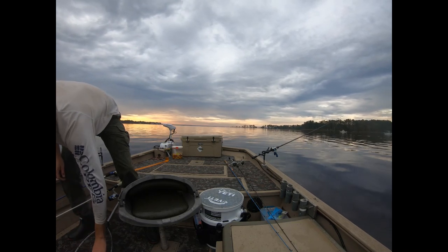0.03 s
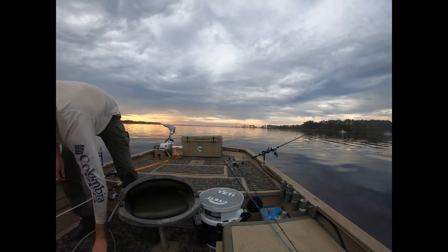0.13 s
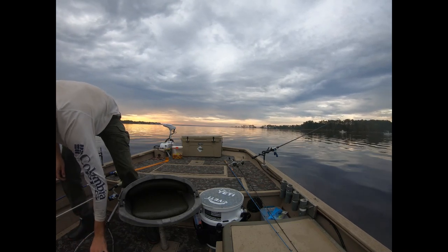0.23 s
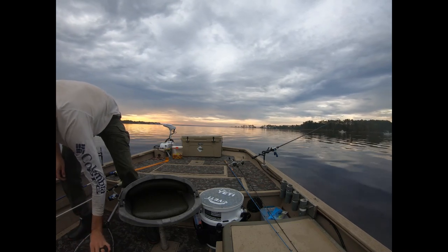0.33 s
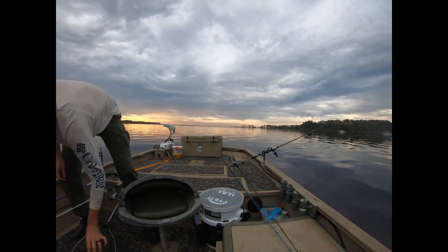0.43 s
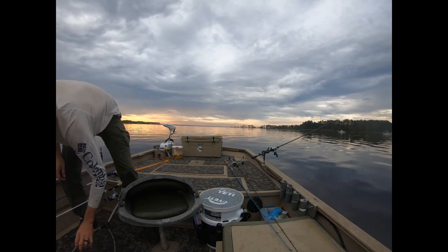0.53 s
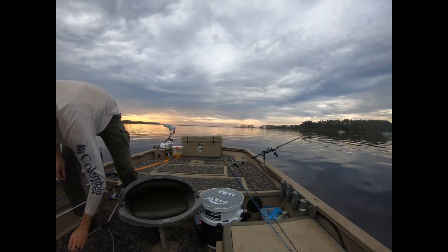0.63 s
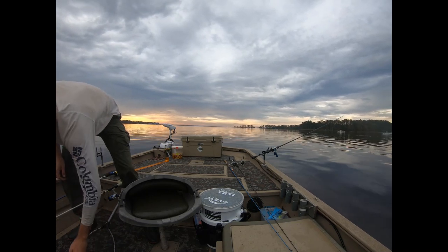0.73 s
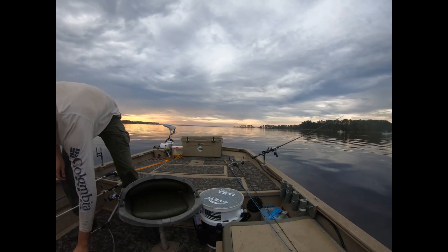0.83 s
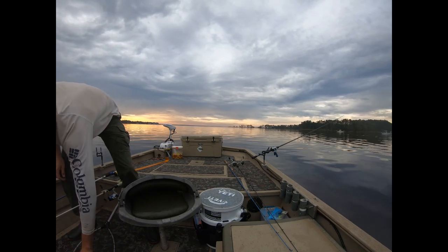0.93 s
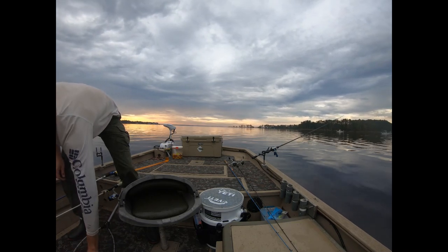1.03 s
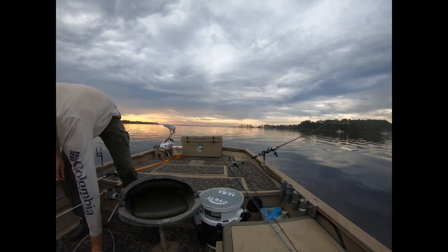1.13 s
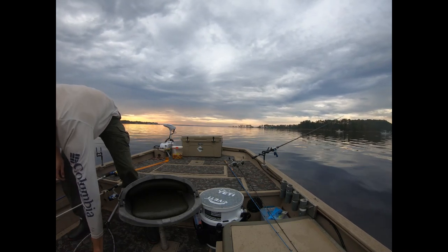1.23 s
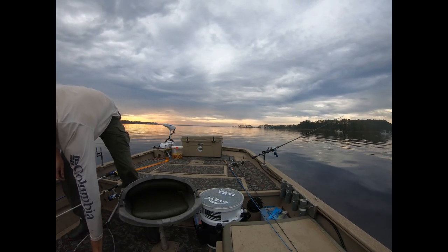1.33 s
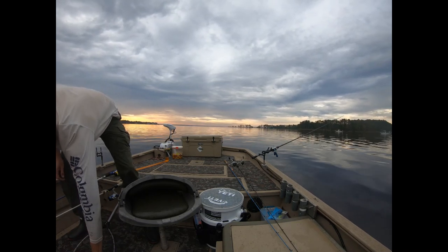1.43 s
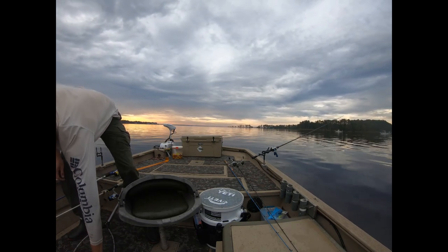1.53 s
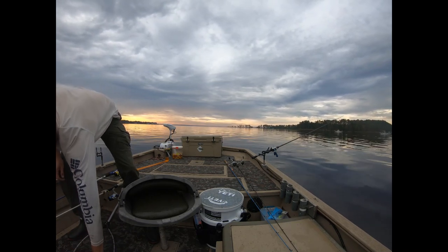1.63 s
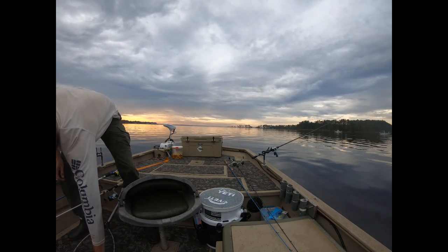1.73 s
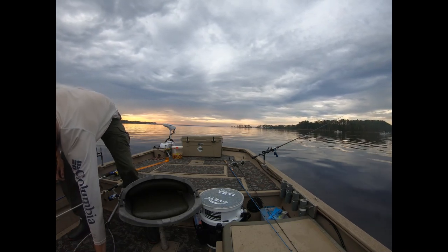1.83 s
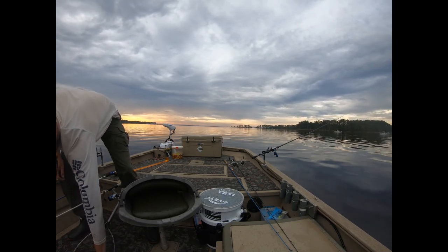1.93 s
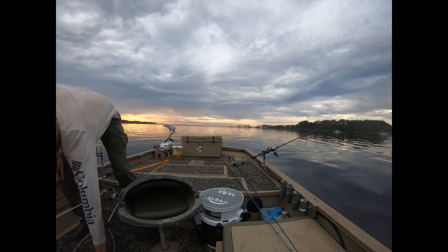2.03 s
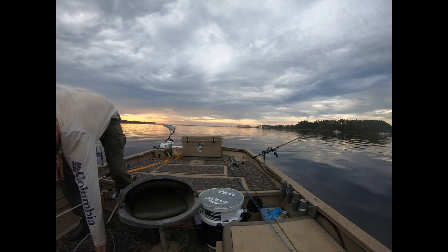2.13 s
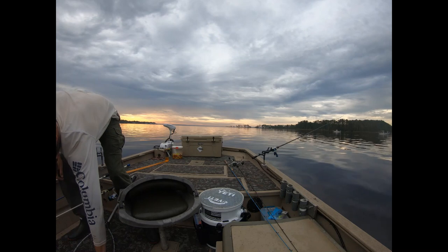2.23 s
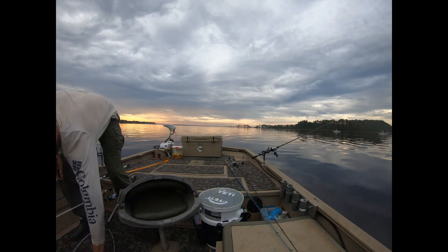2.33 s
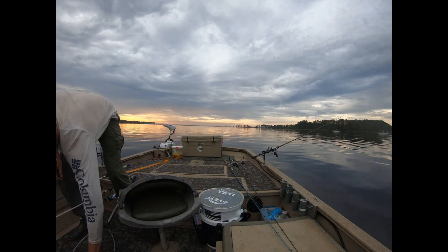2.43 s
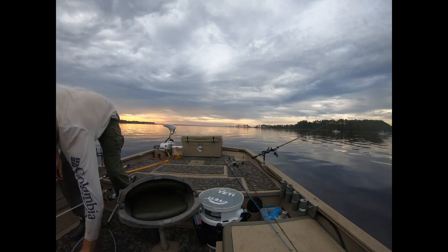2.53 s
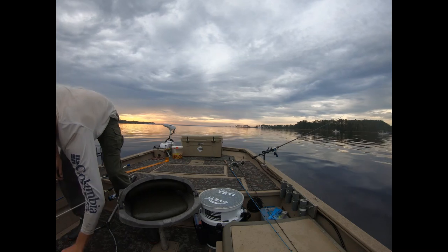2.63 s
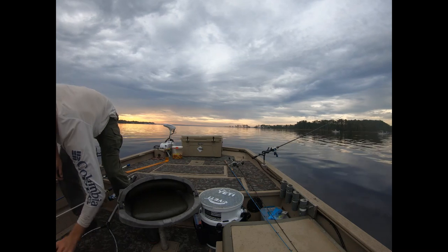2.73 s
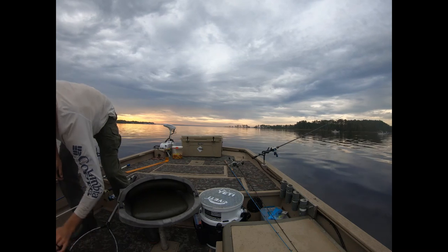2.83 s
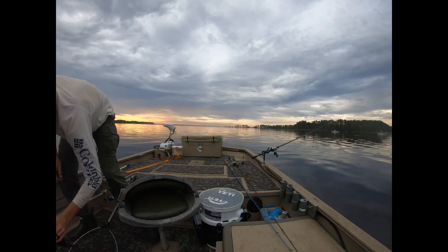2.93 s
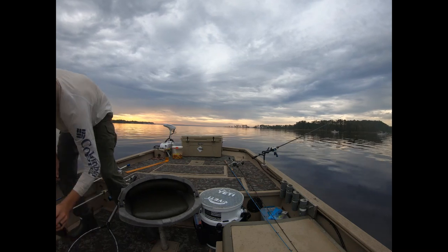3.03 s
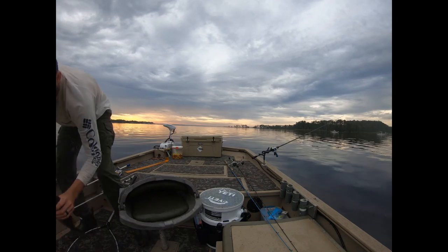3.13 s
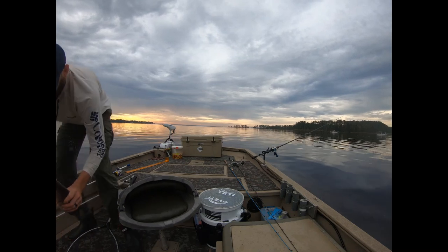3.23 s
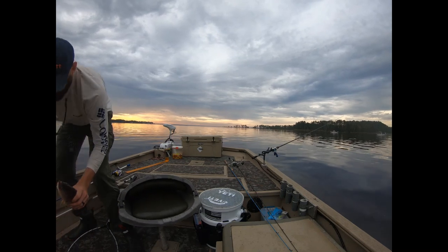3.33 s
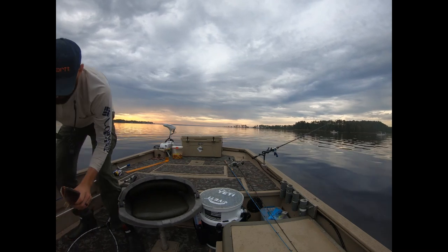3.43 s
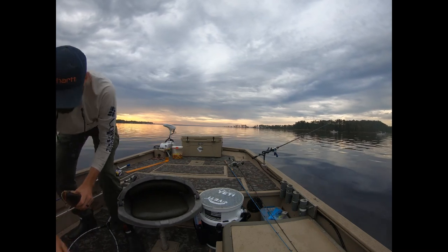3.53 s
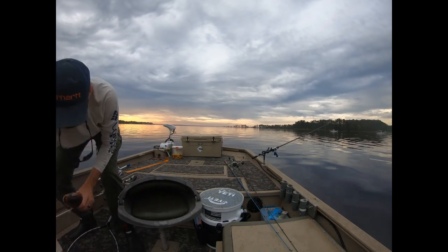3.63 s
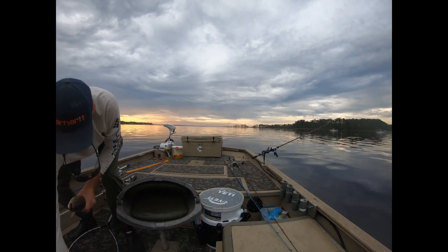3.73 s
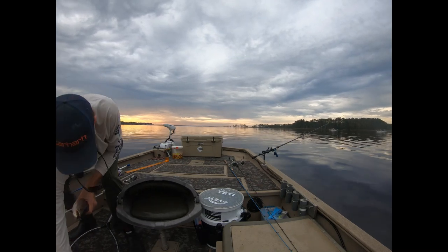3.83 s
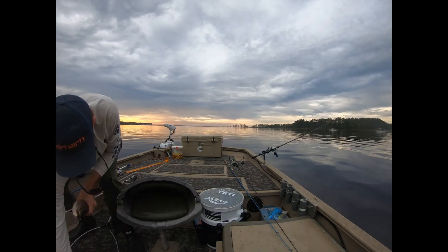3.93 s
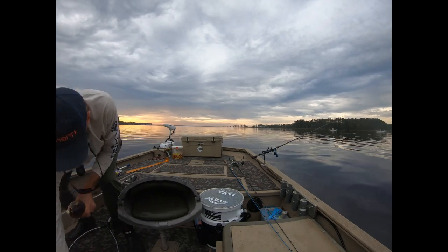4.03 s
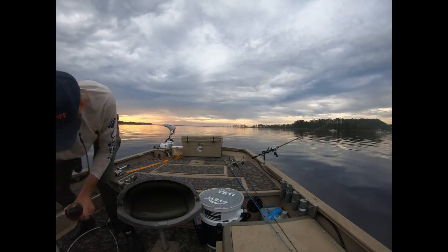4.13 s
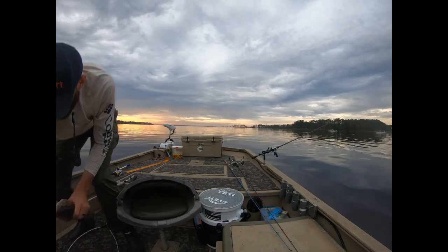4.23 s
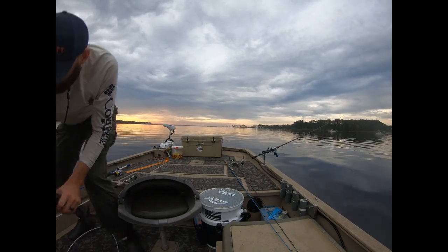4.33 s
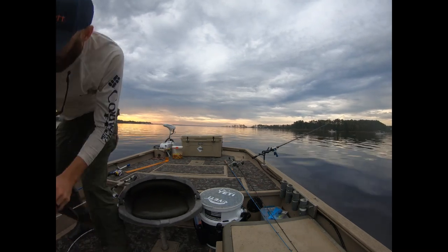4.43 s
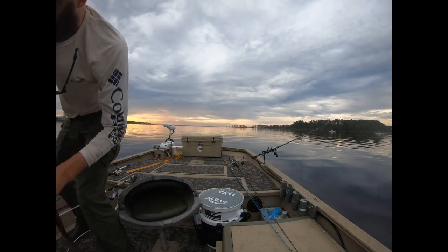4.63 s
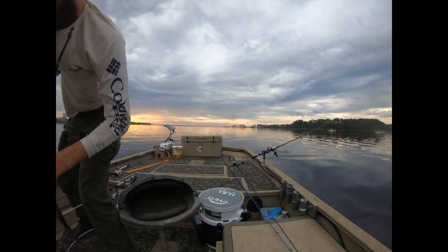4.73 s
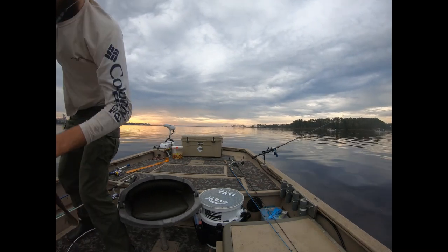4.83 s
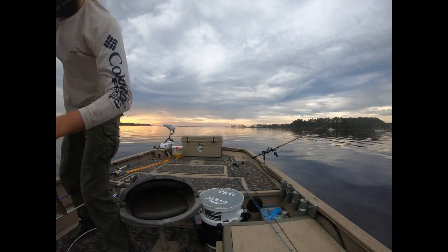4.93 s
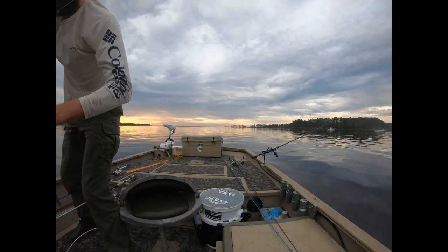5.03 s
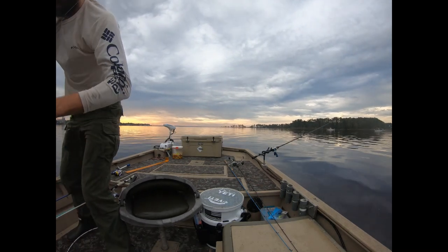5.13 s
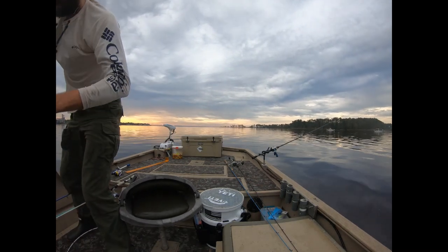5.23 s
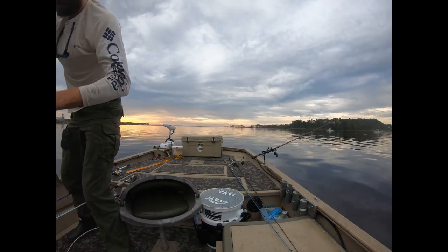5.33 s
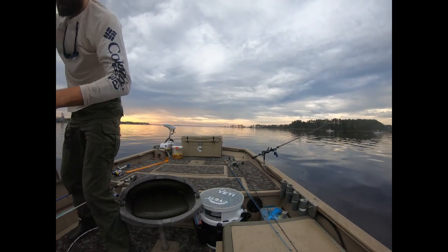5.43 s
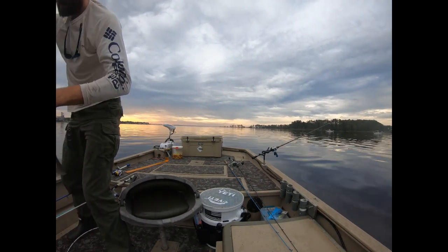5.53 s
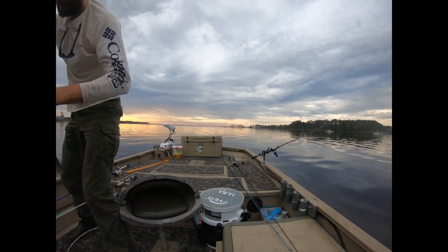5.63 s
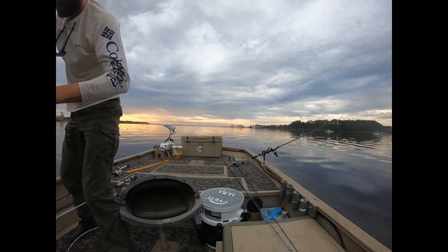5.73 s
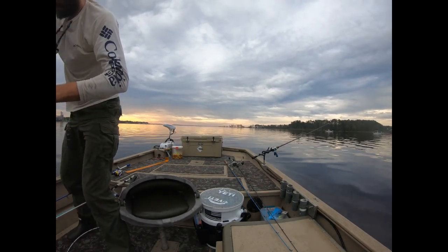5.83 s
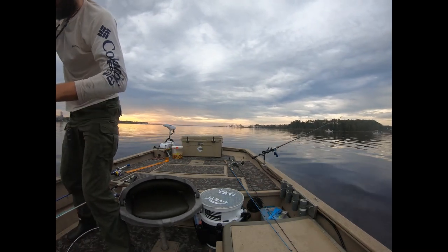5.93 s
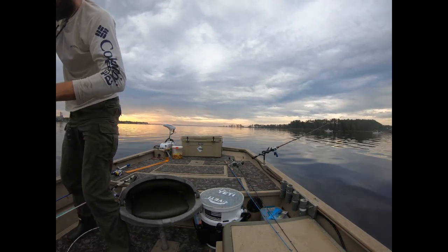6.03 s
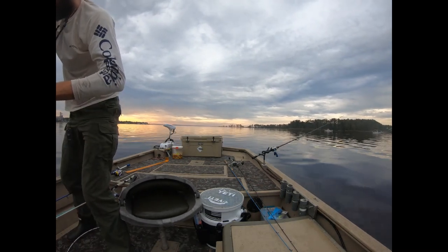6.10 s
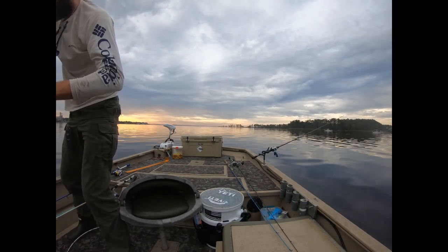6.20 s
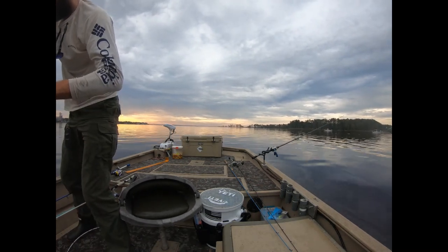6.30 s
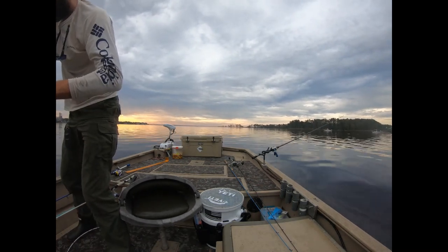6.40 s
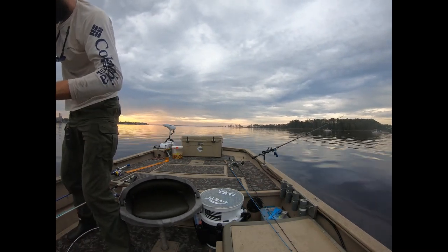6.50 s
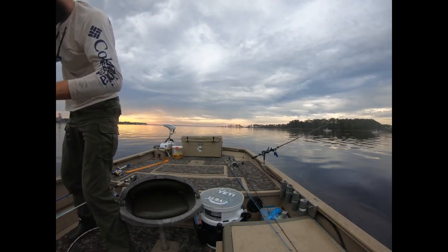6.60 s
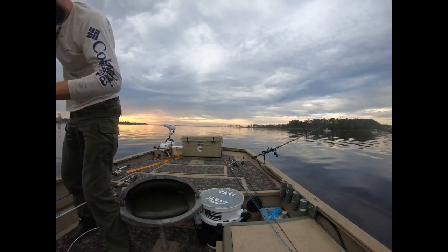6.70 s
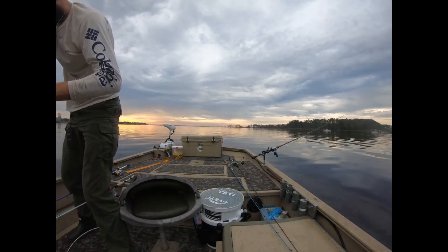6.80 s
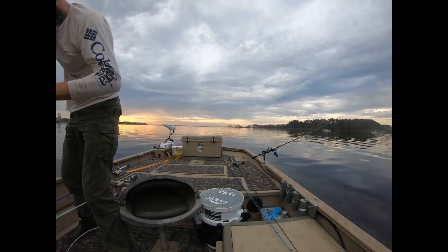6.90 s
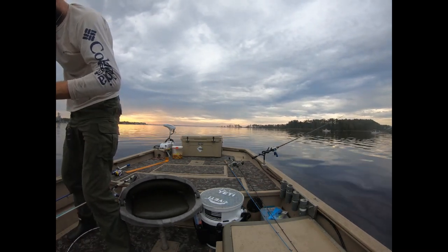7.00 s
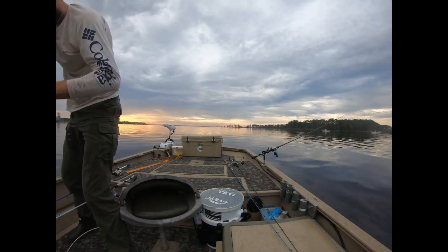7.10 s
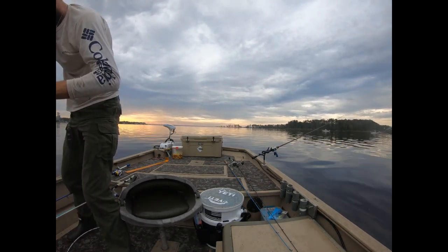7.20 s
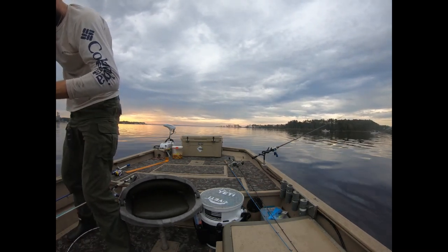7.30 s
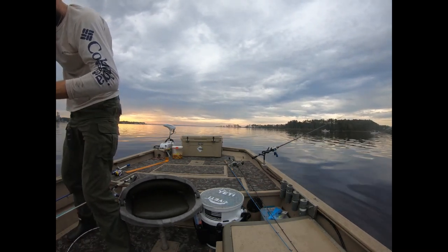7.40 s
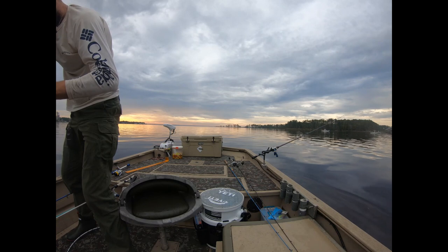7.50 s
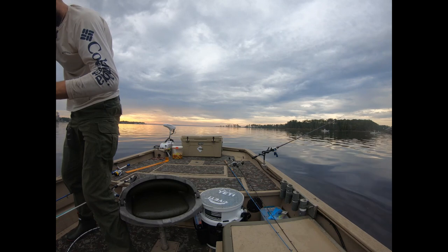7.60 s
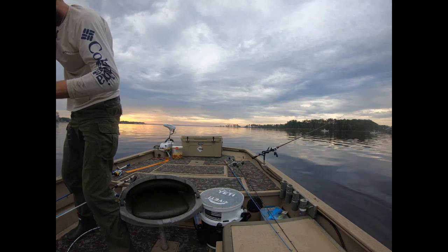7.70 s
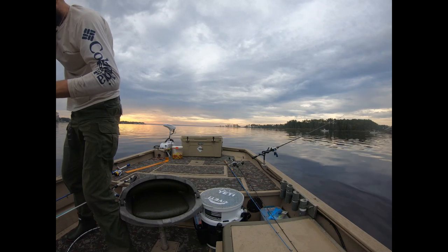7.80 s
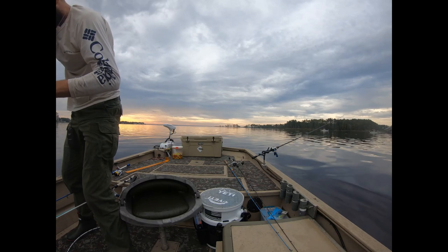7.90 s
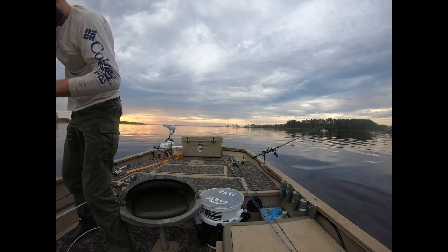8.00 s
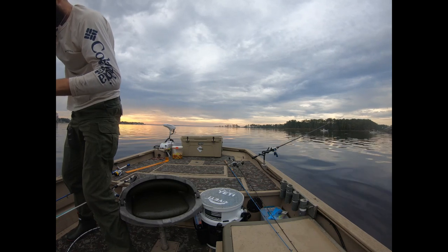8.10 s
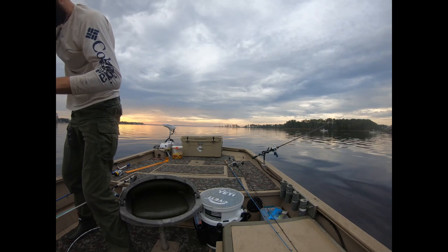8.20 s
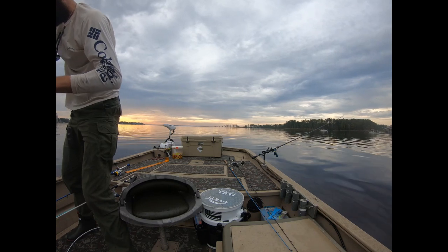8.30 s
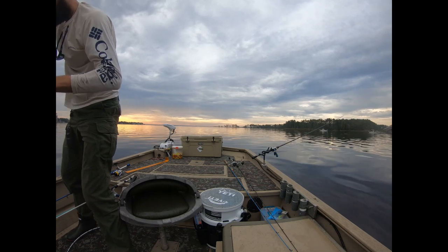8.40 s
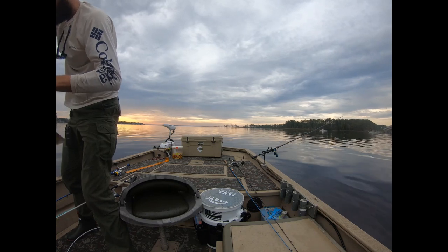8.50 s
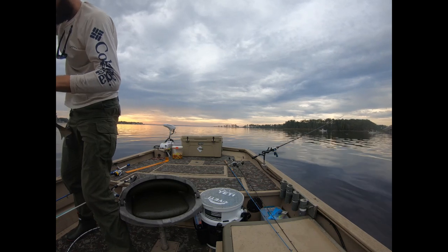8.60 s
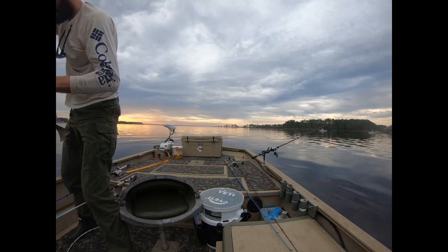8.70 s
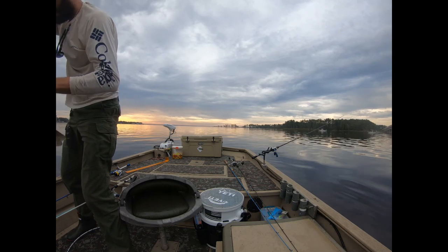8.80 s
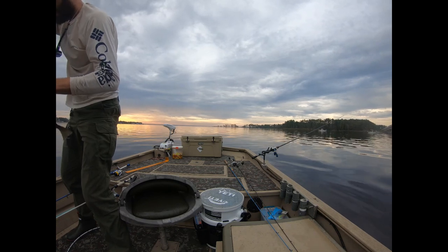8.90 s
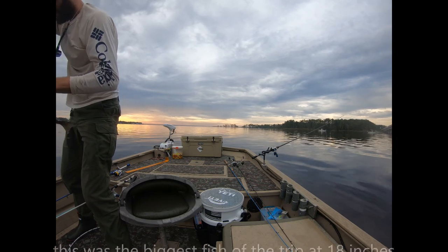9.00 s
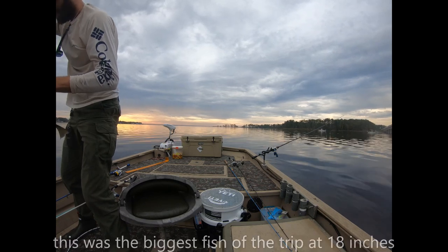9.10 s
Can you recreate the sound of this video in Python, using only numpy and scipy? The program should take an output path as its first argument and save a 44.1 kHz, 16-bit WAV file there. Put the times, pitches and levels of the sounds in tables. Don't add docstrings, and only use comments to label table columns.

```python
import sys
import numpy as np
from scipy import signal
from scipy.fft import rfft, irfft, next_fast_len
from scipy.io import wavfile
from scipy.ndimage import uniform_filter1d, map_coordinates

SR = 44100
rng = np.random.default_rng(int(sys.argv[2]) if len(sys.argv) > 2 else 0)


def store_pcm(level_fs):
    pcm = np.round(np.clip(level_fs, -1, 1) * 32767).astype(np.int16)
    wavfile.write(sys.argv[1], SR, np.atleast_2d(pcm).T)


def linear_from_db(decibels):
    return 10 ** (np.asarray(decibels, float) / 20)


N = 403515

# time [s], level [dB], load [dB].
MOTOR = [(0, -47, -7), (.8, -50, -4.5), (1.7, -44.5, -2), (3, -43, 0.5), (4.2, -42, -7), (5, -43, -1),
         (6.3, -40.5, -1.5), (7, -39.5, -0.5), (7.7, -40.5, 4), (8.3, -40, 5), (9.15, -39.5, 5.5)]
# frequency [Hz], level [dB per Hz].
CRACK_TINT = [(880, -9.5), (1500, -2.5), (2250, -5), (2880, -3.5), (3180, -7), (6000, -7), (7240, -7.5),
              (8920, -6.5), (10900, -21), (14800, -37), (16000, -45)]


def unit(x):
    return x / np.sqrt(np.mean(x ** 2) + 1e-20)


def along(points, hz):
    f, v = np.transpose(points)
    return np.interp(np.log(hz + 1), np.log(f + 1), v)


def curves(rows, outside=None):
    s, *cols = np.transpose(rows)
    return [np.interp(np.arange(N) / SR, s, c, outside, outside) for c in cols]


def wobble(rate_hz):
    knots = rng.standard_normal(int(N * rate_hz / SR) + 4)
    return map_coordinates(knots, [np.arange(N) * rate_hz / SR])


def filtered(x, response):
    m = next_fast_len(x.shape[-1] + 8192)
    spectrum = rfft(x, m) * response(np.fft.rfftfreq(m, 1 / SR))
    return irfft(spectrum, m)[..., :x.shape[-1]]


def resonant(modes):
    def response(f):
        total = 0
        for k, (hz, width_hz, db) in enumerate(modes):
            damped = 1j * f * width_hz
            total = total + (-1) ** k * linear_from_db(db) * damped / (hz * hz - f * f + damped)
        return total
    return response


def tint(spectrum):
    return lambda hz: linear_from_db(along(spectrum, hz))


def spread(pair, alike, lead=((0, 0), (1, 0))):
    turn = lambda hz: np.arccos(np.clip(along(alike, hz), -1, 1)) / 2
    a, b = filtered(pair, lambda hz: np.array([np.cos(turn(hz)), np.sin(turn(hz))]))
    lead_rad = lambda hz: np.interp(hz, *np.transpose(lead))
    return filtered(np.array([a + b, a - b]), lambda hz: np.exp(.5j * np.outer([1, -1], lead_rad(hz))))


def rush(colour, patchy_db):
    z = signal.stft(rng.standard_normal((2, N)), nperseg=512)[2]
    field = uniform_filter1d(rng.standard_normal(z.shape[1:]), size=5, axis=0)
    field = unit(uniform_filter1d(field, size=12, axis=1))
    patchy = signal.istft(z * linear_from_db(patchy_db * field), nperseg=512)[1][:, :N]
    return unit(filtered(patchy, colour))


def add(track, s, sound):
    track[..., round(s * SR):][..., :sound.shape[-1]] += sound


def sides(db):
    return linear_from_db(np.array([[db / 2], [-db / 2]]))


def onset(t, rise_s):
    return 1 - np.exp(-t / rise_s)


def strokes(rows, rise_db_per_s, fall_db_per_s):
    t = np.arange(0, N + 64, 64) / SR
    s, hold_s, db = np.transpose(rows)[..., None]
    before_db = rise_db_per_s * (s - t)
    after_db = fall_db_per_s * (t - s - hold_s)
    level_db = np.max(db - np.maximum(0, np.maximum(before_db, after_db)), axis=0)
    return np.interp(np.arange(N) / SR, t, level_db)


def drone():
    # frequency [Hz], level [dB per Hz].
    rumble_tint = [(12, -57), (20, -32.5), (54, -4.5), (151, -4), (225, -6.5), (286, -10), (439, -20),
                   (551, -9.5), (600, -30.5), (780, -42), (1320, -120)]
    roar_tint = [(180, -15), (300, -4), (437, -6), (547, -9.5), (637, -7.5), (876, -7.5), (1200, -6),
                 (1320, -7.5), (1620, -9.5), (2410, -23), (5000, -49.5), (6500, -77.5), (11000, -120)]
    fizz_tint = [(2060, -34.5), (3500, -26), (5210, -11), (7910, -13), (9300, -9.5), (10200, -15.5),
                 (11000, -38.5), (15500, -47.5)]
    # frequency [Hz], width [Hz], level [dB].
    panel_modes = [(218.4, 55.4, -2.5), (253.8, 40.6, -3)]
    pipe_modes = [(885, 73, 4.5), (1236, 12, 2)]
    # centre [s], gain [dB].
    panel_swells = [(1.3, 1.5), (4.2, 5.5), (5.22, 5), (5.95, 3), (6.2, 5.5), (6.95, 6), (8.3, 5.5),
                    (8.8, 6.5)]
    # time [s], level [dB].
    whine_level = [
        (.6, -59.5),
        (3.2, -46),
        (3.6, -71),
    ]
    # frequency [Hz], left-right likeness [0-1].
    likeness = [(40, .995), (70, 0.97), (290, 0.98), (640, 0.6), (1400, 0.01), (3100, 0.41), (6800, 0.53),
                (15000, 0.29)]
    # frequency [Hz], left over right [dB].
    lean_db = [(300, 0), (700, -6), (1300, -8), (2400, -5.5), (4400, -4.5), (10000, 3.5)]

    roar_db, load_db = curves(MOTOR)
    rumble_db = roar_db - 2.5 + .7 * load_db
    bright_db = 0.74 * load_db
    t = np.arange(N) / SR
    swell_db = sum(db * np.exp(-((t - s) / 0.21) ** 2 / 2) for s, db in panel_swells)

    rumble = linear_from_db(rumble_db + wobble(16)) * rush(tint(rumble_tint), patchy_db=1)
    hum = rush(lambda f: resonant(panel_modes)(f) ** 2, patchy_db=0.5)
    hum = linear_from_db(roar_db - 5.5 + swell_db) * hum
    roar = rush(lambda f: tint(roar_tint)(f) * (1 + 1.01 * abs(resonant(pipe_modes)(f))), patchy_db=0.98)
    top = filtered(roar, lambda f: 1 / (1 + (1600 / (f + 1)) ** 4))
    roar = linear_from_db(roar_db) * (roar + (linear_from_db(bright_db) - 1) * top)
    fizz = linear_from_db(roar_db - 44 + 1.2 * wobble(12)) * rush(tint(fizz_tint), patchy_db=.5)
    whine = rush(lambda f: resonant([(1235, 70, 0)])(f) ** 2, patchy_db=0.5)
    whine = linear_from_db(curves(whine_level)[0]) * whine

    lean = lambda hz: linear_from_db(np.outer([.5, -.5], along(lean_db, hz)))
    return filtered(spread(rumble + hum + roar + whine + fizz, likeness), lean)


def plops():
    # start [s], peak [dB], pitch [Hz], t60 [s].
    knocks = [(0.255, -26.5, 530, 0.16), (2.709, -19, 315, 0.095), (2.872, -24, 302, 0.068),
              (3.216, -7, 950, 0.035), (3.279, -12, 613, 0.046), (3.291, -24, 416, 0.047),
              (4.317, -12, 550, 0.036), (3.467, -17.5, 363, 0.037), (5.159, -22.5, 388, 0.071),
              (6.318, -15, 293, 0.039), (6.448, -15, 304, 0.033), (7.009, -46, 295, 0.054),
              (7.382, -18, 394, 0.037), (7.608, -11.5, 488, 0.054), (7.769, -17, 620, 0.053),
              (8.088, -28, 1000, 0.043), (8.868, -13, 262, 0.045), (8.999, -17, 367, 0.055)]
    water = np.zeros(N + SR)
    t = np.arange(SR // 5) / SR
    for s, db, hz, t60 in knocks:
        cavity = resonant([(1.2 * hz, 1.1 * hz, 0)])
        puff = rng.standard_normal(len(t))
        puff = unit(filtered(puff, lambda f: cavity(f) ** 2 / (1 + (f / 2200) ** 6)))
        tone = np.sin(2 * np.pi * hz * t) + 0.44 * puff * (1 + 0.72 * np.exp(-t / 0.0027))
        add(water, s, linear_from_db(db - 12.0 - 60 * t / t60) * onset(t, 0.0012) * tone)
    return water[:N] * sides(-2.5)


def keel():
    # start [s], level [dB].
    heavy_blows = [
        (0.09, -29.5),
        (0.311, -30.5),
        (0.6, -32),
        (3.299, -38),
        (3.94, -29),
        (4.501, -36),
    ]
    # frequency [Hz], level [dB], t60 [s].
    hull_modes = [(72, -1, 1.28), (92, -8, .9)]
    hull = np.zeros((2, N + SR))
    t = np.arange(SR) / SR
    for s, db in heavy_blows:
        ring = sum(linear_from_db(level - 60 * t / t60) * np.sin(2 * np.pi * hz * t) for hz, level, t60 in hull_modes)
        add(hull[0], s, linear_from_db(db) * onset(t, .015) * ring)
    return hull[:, :N]


def rustle():
    # frequency [Hz], level [dB per Hz].
    rub_tint = [(1060, -31), (1800, -4.5), (2590, -14.5), (2900, -9), (4250, -15), (5250, -15),
                (9500, -16.5), (11100, -26), (14500, -40), (16000, -51)]
    # start [s], hold [s], level [dB].
    hand_strokes = [(0, .6, -75), (.6, 0.048, -76), (3.11, 0.06, -63), (3.2, .1, -64.5),
                    (3.35, 0.28, -59.5), (3.62, 0.13, -53.5), (3.78, 0.15, -61), (3.93, 0.03, -68),
                    (4.0, .04, -68), (4.14, .02, -63.5), (4.2, .08, -62), (4.29, 0.18, -59),
                    (4.52, 0.22, -65), (4.75, 0.043, -60), (4.85, 0.18, -63), (8.51, .03, -72),
                    (8.67, .06, -71.5), (8.8, 0.41, -78.5)]
    cloth_shifts = [(2.15, 0.13, -78), (2.85, .03, -77.5), (5.1, .03, -86), (5.75, 0.17, -83),
                    (6.48, .03, -88), (8.4, .05, -83)]
    # time [s], level [dB].
    squeeze = [
        (4.69, -72),
        (4.725, -53.5),
        (4.815, -52.5),
        (4.85, -75),
    ]
    # frequency [Hz], width [Hz], level [dB].
    grip_modes = [(2720, 200, 0), (2950, 240, 0), (3280, 260, -3), (3680, 240, -5)]

    grains = rush(lambda f: 1, patchy_db=2.2) * linear_from_db(2.2 * wobble(500) + 1.5 * wobble(30))
    grip = unit(filtered(grains, lambda f: resonant(grip_modes)(f) ** 2))
    squeak = linear_from_db(curves(squeeze, -140)[0]) * grip
    level = linear_from_db(strokes(hand_strokes, 188, 120.5))
    level += linear_from_db(strokes(cloth_shifts, 27.5, 44))
    level += linear_from_db(curves(MOTOR)[0] - 42.5)
    return linear_from_db(6.0) * level * unit(filtered(grains, tint(rub_tint))) + squeak


def clacks():
    # start [s], peak [dB], crack t60 [s].
    edge_hits = [(0.0805, -37.5, 0.0099), (0.3162, -26.5, .008), (0.4935, -25.5, 0.011),
                 (3.2156, -31.5, .012), (3.2785, -28, .008), (4.4495, -10.5, .012), (4.5955, -31, .008),
                 (4.982, -29, .006), (5.0345, -23.5, .008)]
    # frequency [Hz], level [dB], t60 [s].
    fitting_modes = [(2283, -9, .06), (2902, -1, .05), (3500, -1, .05), (4888, -9.5, .05),
                     (5480, -9.5, .04), (6815, -7, .04), (8500, -6.5, .03)]
    # start [s], peak [dB], centre [Hz], t60 [s].
    nick_hits = [(2.711, -43, 2500, 0.025), (2.71, -32, 480, .05), (2.875, -48, 1900, .02),
                 (5.205, -51, 3600, 0.13), (5.702, -51, 3600, .04), (5.827, -58, 4200, .03),
                 (6.165, -69, 4200, .03), (6.354, -53, 3500, .03), (6.354, -64, 6800, .03),
                 (6.444, -67, 4000, .05), (6.487, -53, 3500, 0.062), (6.6, -60, 5500, .03),
                 (6.635, -55.5, 3900, .05), (8.475, -55, 3600, 0.032), (8.68, -53, 3600, .04),
                 (0.335, -21.5, 210, 0.088), (0.62, -33.5, 170, 0.38), (3.925, -19, 72, .15),
                 (4.452, -27, 2100, 0.14), (4.455, -38, 3600, .09), (7.61, -33, 700, 0.043),
                 (9.078, -53, 3300, .04), (4.451, -33, 7000, .07), (0.93, -39.5, 139.4, 0.43),
                 (6.247, -62.5, 5300, .03), (6.766, -62, 5200, .03), (5.28, -58, 4200, .05),
                 (8.49, -52, 4700, .03)]

    edge = np.zeros((2, N + SR))
    t = np.arange(SR // 5) / SR
    crack_response = lambda hz: tint(CRACK_TINT)(hz) / (1 + (hz / 11500) ** 12)
    for s, db, t60 in edge_hits:
        crack = unit(filtered(rng.standard_normal((2, len(t))), crack_response)) * linear_from_db(-60 * t / t60)
        ring = np.zeros(len(t))
        for hz, level, life_s in fitting_modes:
            decay = linear_from_db(level + rng.normal(0, 3) - 60 * t / life_s)
            ring += decay * np.sin(2 * np.pi * hz * rng.normal(1, 0.026) * t)
        add(edge, s, linear_from_db(db - 7.5) * (crack + linear_from_db(-15) * ring * [[1], [.5]]))
    for s, db, hz, t60 in nick_hits:
        wide = resonant([(hz, .6 * hz, 0)])
        nick = unit(filtered(rng.standard_normal((2, len(t))), lambda f: wide(f) ** 2))
        add(edge, s, linear_from_db(db - 5 - 60 * t / t60) * onset(t, .0015) * nick)
    return edge[:, :N]


def tackle():
    # start [s], peak [dB], low part [dB], t60 [s].
    scales = [(0.0818, -54.5, -5, .08), (0.098, -24.5, -6.5, 0.089), (0.1188, -25.5, -6, 0.026),
              (0.1875, -40.5, -1, .025), (0.196, -48.5, -4, 0.063), (0.2803, -35.5, -5, 0.12),
              (0.3162, -26.5, -7.5, 0.07), (0.329, -40.5, 6, 0.064), (0.3513, -34.5, -4.5, 0.069),
              (0.49, -36, -0.5, .06), (0.4994, -14, -6.5, 0.06), (0.507, -24, 1.5, .07),
              (0.5285, -28, -5.5, 0.094), (0.5515, -25, -14, 0.043), (0.5866, -29.5, -11.5, 0.026),
              (0.599, -41.5, -13.5, 0.046), (0.625, -51, -18, 0.13)]
    clasp = [(3.123, -34.5, -5, 0.045), (3.3199, -23.5, -4, 0.02), (3.328, -26, -12, 0.03),
             (3.418, -32, -18.5, 0.049), (3.470, -37.5, -2, 0.03), (3.497, -38, 1, 0.027),
             (4.336, -38.5, -10, 0.044), (4.940, -44, -12, 0.045), (4.9808, -30.5, 1.5, 0.023)]
    hooks = [(3.1122, -42.5, 0, 0.046), (3.1603, -36, 0, 0.087), (3.271, -39, 1, 0.041),
             (3.277, -26, 3, 0.076), (3.470, -36.5, -7, .06), (3.490, -37, -11, 0.12),
             (3.6607, -36.5, -3, 0.11), (3.897, -33.5, -5, 0.074), (3.9148, -33.5, -7, .033),
             (4.149, -45, 0, .03), (4.319, -36, -18, 0.078), (4.3374, -35.5, -11, .06),
             (4.404, -47, 6.5, 0.36), (4.45, -17.5, 2, 0.055), (4.5179, -24.5, -8.5, 0.035),
             (4.543, -39, -8, 0.026), (4.5943, -38, 0.5, 0.068), (4.6423, -50.5, 12, 0.087),
             (4.682, -43.5, -7, 0.048), (4.8, -43, -18, 0.086), (4.8453, -42.5, -3, 0.047),
             (5.034, -35.5, 2, 0.098)]
    line_brush = [(3.103, -47, 5, 0.029), (3.311, -44, -18, .02), (3.35, -46, -12.5, .05),
                  (3.505, -43.5, -10, 0.051), (3.906, -43, -14, 0.059), (3.993, -48, -14, 0.15),
                  (4.328, -42, -10, 0.094), (4.508, -43.5, -9, .03), (4.724, -48.5, -10, 0.044),
                  (5.036, -39.5, -10, 0.049)]
    bar = [(3.1806, -27, -2.5, 0.045), (3.2425, -40.5, 7, .05), (3.899, -46, -14, 0.025)]
    # start [s], peak [dB], low part [dB].
    swivel = [(2.1385, -52, 8), (8.475, -43.5, -12), (8.4833, -43, 0), (8.536, -46.5, -3), (8.662, -49, 1),
              (8.677, -47.5, 2), (8.895, -55, 4)]
    # start [s], peak [dB].
    line_ticks = [(0.842, -55), (2.055, -54), (2.8337, -51), (5.2, -55.5), (5.215, -51), (5.7043, -52),
                  (5.718, -53), (6.0038, -53), (6.018, -56.5), (6.6393, -51.5), (7.5016, -58), (7.633, -56),
                  (7.645, -56), (8.3549, -56), (8.72, -50), (8.886, -50)]
    fin_snaps = [(0.0902, -34.5), (0.1037, -23.5), (0.1114, -31), (0.306, -37.5), (0.3164, -21),
                 (0.3294, -32.5), (0.5302, -24), (0.544, -36), (0.55, -31.5), (4.6399, -37.5)]
    glints = [(0.0251, -48.5), (0.052, -54.5), (0.407, -50.5), (5.278, -51.5), (5.422, -58), (5.578, -64),
              (5.78, -58), (5.955, -58), (6.247, -65), (6.347, -58), (6.4446, -59), (6.466, -55),
              (6.488, -54), (6.7681, -61), (8.737, -57), (9.075, -48)]
    # ring [Hz], pitch scatter [log ratio], ring level [dB].
    part_rings = [
        (4540, 0.17, -22.5),
        (6090, .003, 3),
        (3840, 0.047, -20),
        (4820, 0.024, -7),
        (5340, 0.015, 1),
        (8950, 0.028, -5),
        (8950, 0.036, -9),
        (9120, 0.055, -9.5),
        (3030, .02, 0),
    ]
    # crack [dB], hold exponent (1 dies at once, 4 stops short), top octave [dB],
    # overtone share.
    part_touch = [
        (0.7, 1.25, -6, .1),
        (-7.5, 3.1, -1.5, 0.25),
        (1, 1.3, 3.5, 0.15),
        (1, 1.15, 4, 0.13),
        (3.5, 0.77, -11.5, .03),
        (2, 1.1, -5, .01),
        (-3, 4.3, -1.4, .01),
        (3, 1.35, -2.5, .01),
        (-0.5, 1.5, 3, 0.22),
    ]

    parts = [
        scales,
        clasp,
        hooks,
        [(*row, .075) for row in swivel],
        [(s, db, 1.5, .085) for s, db in line_ticks],
        [(s, db + 6.0, -30, .012) for s, db in fin_snaps],
        line_brush,
        [(s, db, -5, .05) for s, db in glints],
        bar,
    ]
    hits = [(*row, *ring, *touch) for rows, ring, touch in zip(parts, part_rings, part_touch) for row in rows]

    low, high, air, rings = np.zeros((4, 2, N + SR))
    t = np.arange(SR // 5) / SR
    for s, db, low_db, t60, hz, scatter, ring_db, crack_db, hold, air_db, overtone in hits:
        hz = hz * np.exp(scatter * rng.normal())
        rise_s = .0009 + 0.0025 * (db < -47)
        shape = linear_from_db(-60 * (t / t60) ** hold) * onset(t, rise_s)
        shape *= 1 + 0.52 * (hold < 2) * np.exp(-t / 0.00075)
        grit = linear_from_db(1.63 * np.repeat(rng.standard_normal(len(t) // 60 + 1), 60)[:len(t)])
        burst = rng.standard_normal((2, len(t))) * shape * grit
        add(high, s, linear_from_db(db + crack_db - 8.5) * burst)
        add(air, s, linear_from_db(db + air_db - 4.5 - .45 * max(db + 41.5, 0)) * burst)
        add(low, s, linear_from_db(db + crack_db + low_db - 7.5) * burst)
        q = 7 if hz > 8000 else hz / 130
        ring = signal.lfilter(*signal.iirpeak(hz, q, SR), burst)
        ring += overtone * signal.lfilter(*signal.iirpeak(1.52 * hz, 6, SR), burst)
        add(rings, s, linear_from_db(db + ring_db + 8.5) * ring)

    crack = tint(CRACK_TINT)
    scale = np.sqrt(np.mean(crack(np.linspace(4000, 11000, 50)) ** 2) / 3)
    upper = lambda hz: 1 / (1 + (4500 / (hz + 1)) ** 5)
    both = filtered(high, lambda hz: crack(hz) * upper(hz) * (hz < 11000) / scale)
    both += filtered(air, lambda hz: crack(hz) * (hz >= 11000) / (1 + (hz / 14900) ** 30) / scale)
    both += filtered(low, lambda hz: crack(hz) * (1 - upper(hz)) / scale)
    return (both + rings)[:, :N]


def hull_tail(tone, t60s):
    f, u, z = signal.stft(rng.standard_normal(SR), SR, nperseg=1024)
    z = z * linear_from_db(along(tone, f)[:, None] - 60 * u / along(t60s, f)[:, None])
    tail = signal.istft(z, SR, nperseg=1024)[1][:SR]
    fade = np.hanning(2 * SR)[SR:] ** .5
    return tail / np.std(tail[:2048]) * onset(np.arange(SR) / SR, 0.0047) * fade


def blows():
    # start [s], peak [dB], boom [Hz], slap [dB].
    flaps = [(0.002, -13, 70.6, -22), (0.05, -17, 79, -34.5), (0.08, -7.5, 92, -13),
             (0.093, -12, 68.6, -9.5), (0.138, -12, 136, -17), (0.169, -20.5, 121, -16),
             (0.295, -11.5, 81.2, -10.5), (0.31, -10, 131, -13.5), (0.349, -16.5, 72.5, -12.5),
             (0.49, -5, 112, -9), (0.502, -12, 96.7, -0.5), (0.516, -14.5, 146, -9.5),
             (0.533, -11, 202, -22.5), (0.563, -7.5, 77.5, -23.5), (0.609, -22, 95, -22)]
    thumps = [(3.185, -23.5, 88, -0.5), (3.204, -20, 141, -3.5), (3.225, -20.5, 156, -22),
              (3.249, -18.5, 114, -5.5), (3.276, -10, 107.4, -11), (3.291, -11, 81.7, -12),
              (3.329, -22, 73.6, -23), (3.38, -25, 98, -11.5), (3.429, -21, 74.4, -16),
              (3.474, -31, 67.5, 0.5), (3.649, -30.5, 80, -3), (3.713, -33, 66, -1.5),
              (3.86, -17.5, 72.5, -18), (3.915, -15, 118.7, -21), (3.934, -10, 118, -34),
              (3.978, -16.5, 73.6, -37), (4.009, -23, 91, -44), (4.289, -17.5, 114, -14),
              (4.318, -17, 64.8, -5.5), (4.344, -16, 102, -9), (4.368, -16.5, 65, -19),
              (4.446, -8, 133.4, -2.5), (4.465, -19, 172, 2.5), (4.494, -4.5, 74.5, -30),
              (4.518, -34.5, 51.1, 4), (4.575, -15.5, 99, -29), (4.634, -20.5, 147, -20),
              (4.663, -16, 80.6, -22)]
    # frequency [Hz], level [dB per Hz].
    slap_tint = [(88, -20.5), (150, 1.5), (701, -18), (971, -22.5), (1130, -20.5), (1260, -25), (1930, -34),
                 (2910, -37), (3220, -36), (9000, -44), (11700, -63.5), (19800, -120)]
    hull_tone = [(15, -51.5), (25, -22.5), (59, -6), (82, 3), (210, 0.5), (227, -33.5), (600, -48.5),
                 (780, -80.5), (1320, -120)]
    # frequency [Hz], hull t60 [s].
    hull_t60 = [(40, 0.49), (80, 0.94), (150, 0.22), (300, 0.62), (800, 0.175)]

    deck = np.zeros((2, N + 2 * SR))
    t = np.arange(SR // 3) / SR
    for s, db, hz, slap_db in [*flaps, *thumps]:
        t60 = 0.25 * linear_from_db(0.25 * slap_db)
        boom = np.sin(2 * np.pi * hz * t) * linear_from_db(db - 1.0 - 60 * t / t60) * onset(t, 0.0028)
        thin_db = 13.0 * (s < 1)
        plate = np.sin(2 * np.pi * 300 * rng.normal(1, 0.066) * t)
        plate *= linear_from_db(db + slap_db - 8.0 + thin_db - 60 * t / 0.051) * onset(t, 0.0071)
        add(deck, s, (boom + plate) * [[1], [0.76 * rng.normal()]])
        slap = unit(filtered(rng.standard_normal((2, len(t))), tint(slap_tint)))
        add(deck, s, slap * linear_from_db(db + slap_db - 0.5 - 60 * t / 0.17) * onset(t, 0.0029))
        add(deck[0], s, linear_from_db(db - 20.5) * hull_tail(hull_tone, hull_t60))
    return deck[:, :N]


def scene():
    # frequency [Hz], left-right likeness [0-1].
    near_likeness = [(40, .995), (70, .96), (300, .97), (1400, .8), (4000, .62), (15000, .45)]
    # frequency [Hz], left lead [rad].
    port_lead = [(0, 0), (4000, .2), (7000, 2.8), (9500, 3.4), (13000, 6.3), (16000, 8)]
    around = drone() + plops()
    gear = keel() + rustle() + clacks() + tackle() + blows()
    toward_right = lambda hz: linear_from_db(np.outer([-1, 1], along([(400, .2), (3000, 1.3)], hz)))
    return around + filtered(spread(gear, near_likeness, port_lead), toward_right)


def coarse(x):
    hz, t, z = signal.stft(x, SR, nperseg=2048)
    band = hz > 10500
    top = z[:, band]
    patches = rng.standard_normal((len(hz) // 32 + 1, len(t) // 2 + 1))
    scatter_db = 4 * np.kron(patches, np.ones((32, 2)))[:top.shape[1], :len(t)]
    nearby = uniform_filter1d(abs(top), size=64, axis=1)
    step = linear_from_db(scatter_db) * np.clip(linear_from_db(6) * nearby, linear_from_db(-101), linear_from_db(-89))
    z[:, band] = top * np.round(abs(top) / step) * step / (abs(top) + 1e-12)
    return signal.istft(z, SR, nperseg=2048)[1][:, :N]


def band_limit(x):
    return signal.sosfilt(signal.butter(12, 15900, fs=SR, output="sos"), x)


def record(dry):
    cut_db = lambda hz: -9 / (1 + np.exp((10400 - hz) / 120))
    lift_db = lambda hz: 7 * np.exp(-((hz - 14500) / 1100) ** 2)
    housed = filtered(dry, lambda hz: linear_from_db(cut_db(hz) + lift_db(hz)))
    housed = housed / (1 + abs(housed / .7) ** 4) ** (1 / 4)
    return band_limit(coarse(housed))


dry = scene()
out = record(dry)
store_pcm(out)
```